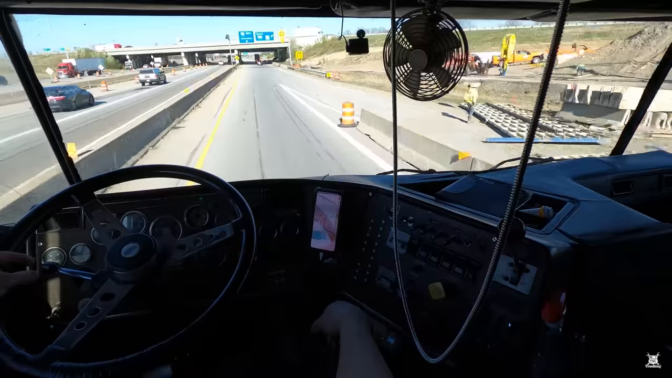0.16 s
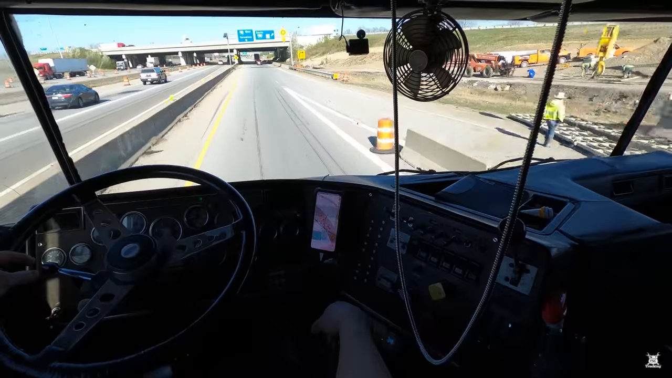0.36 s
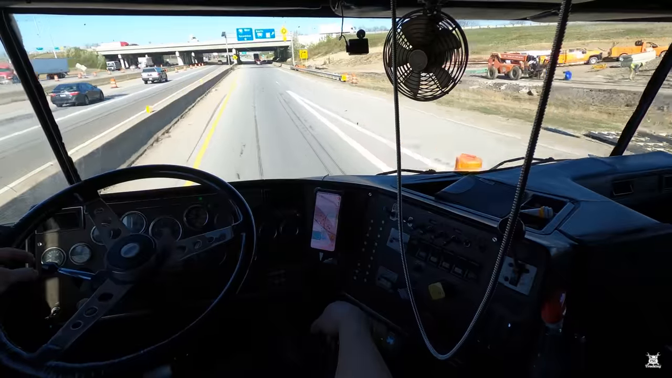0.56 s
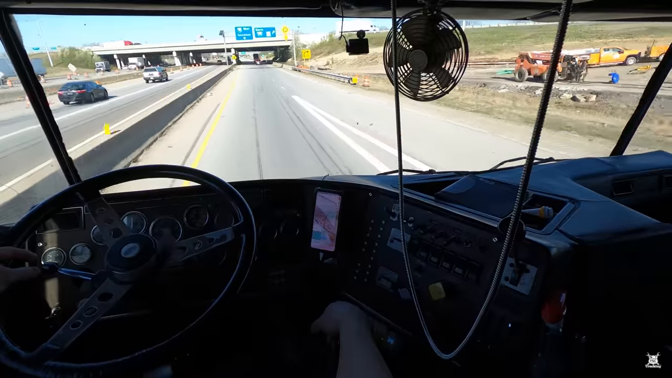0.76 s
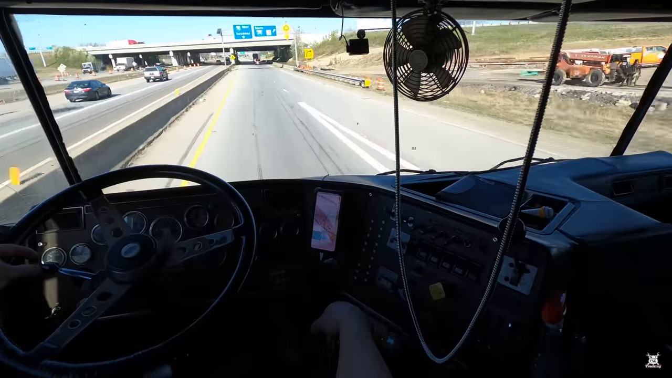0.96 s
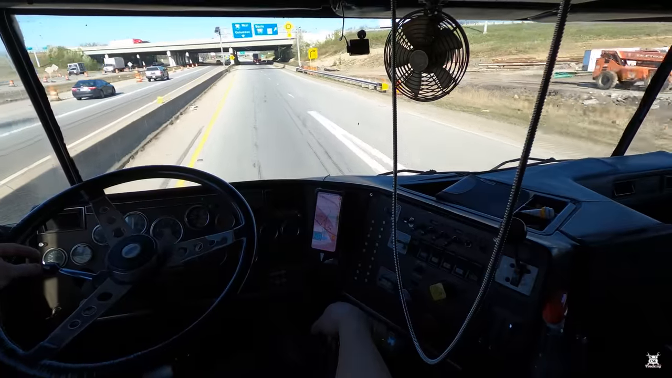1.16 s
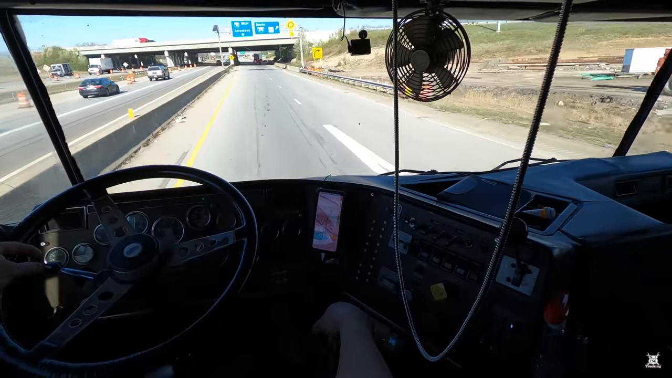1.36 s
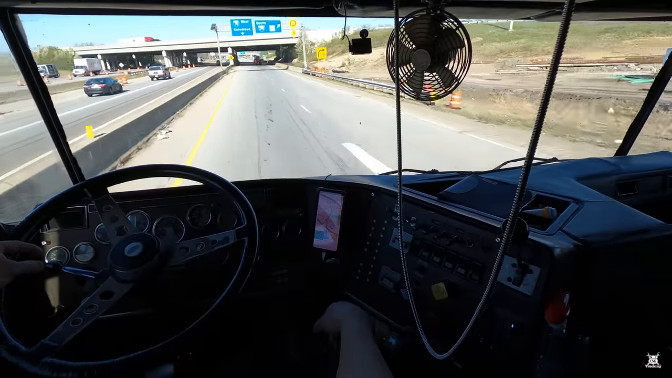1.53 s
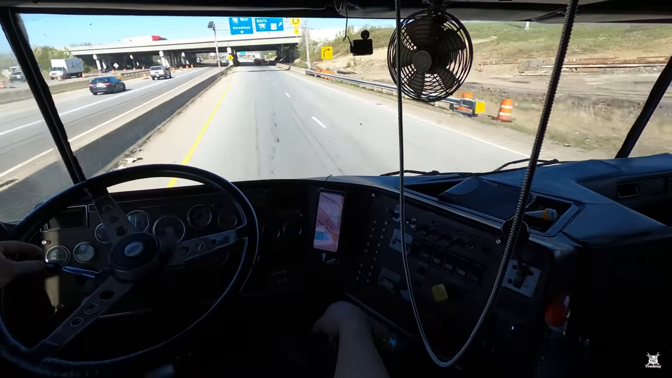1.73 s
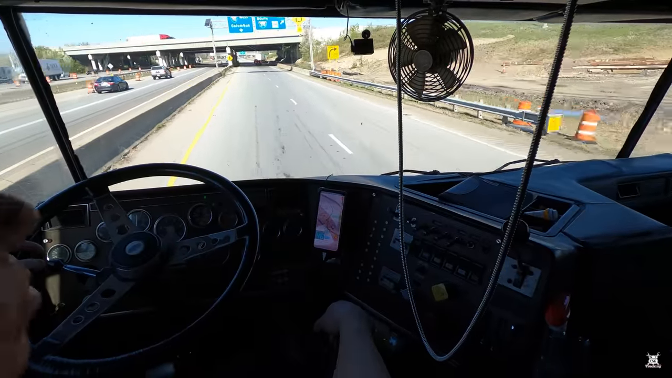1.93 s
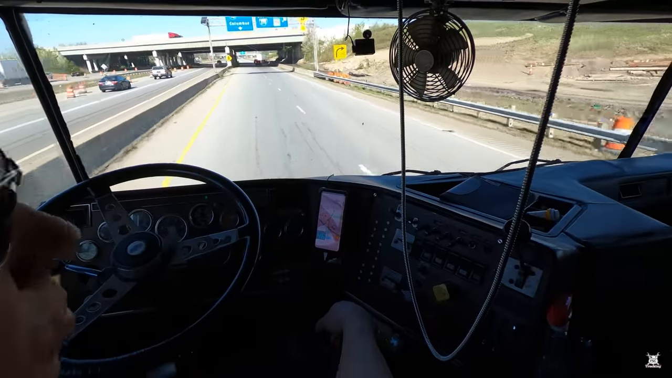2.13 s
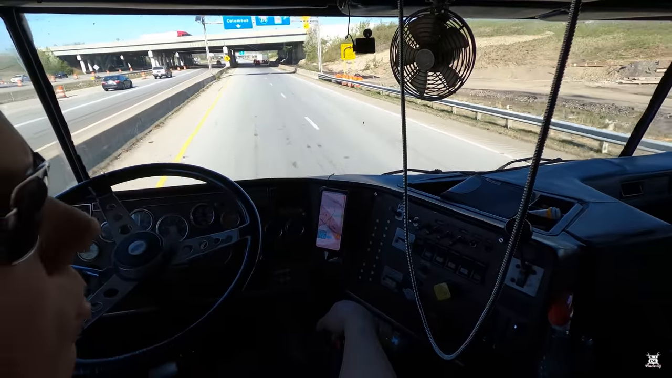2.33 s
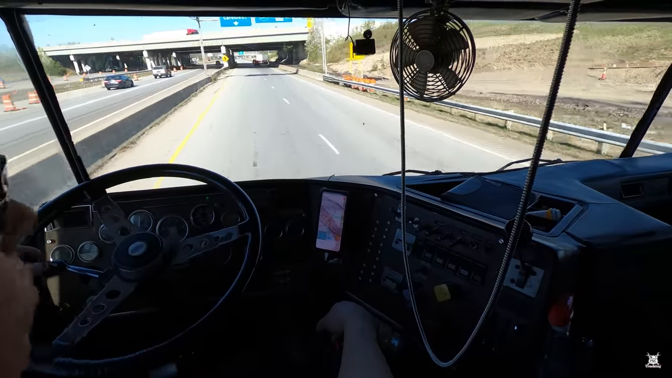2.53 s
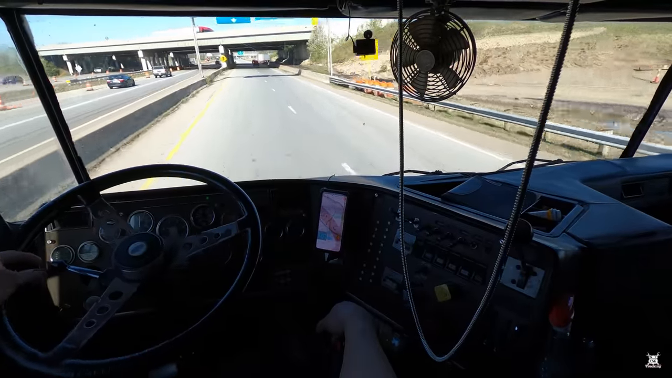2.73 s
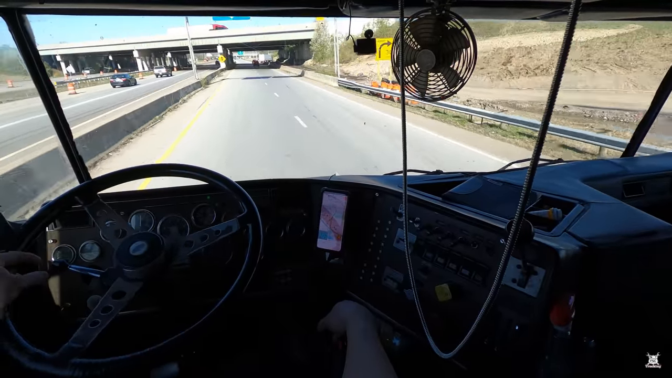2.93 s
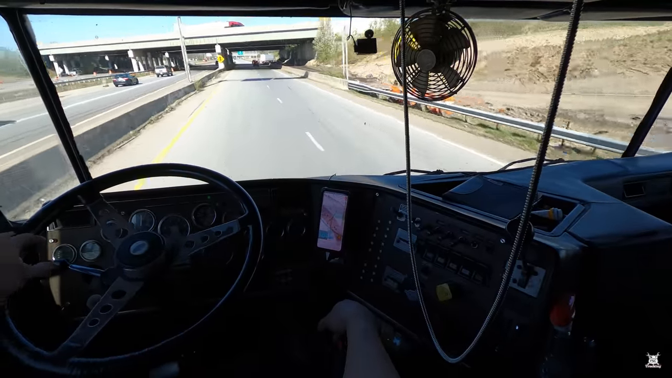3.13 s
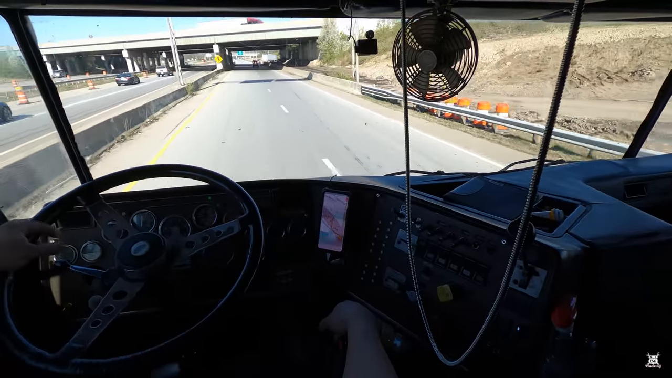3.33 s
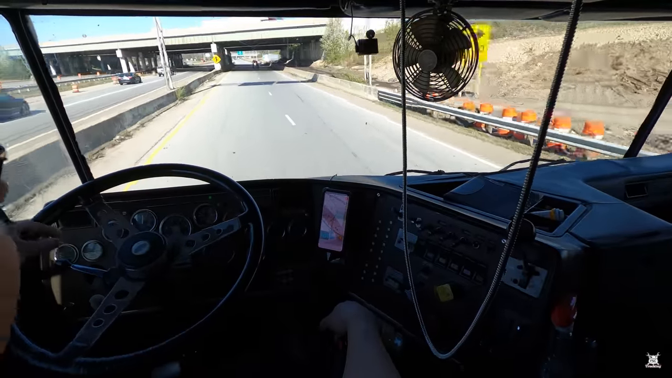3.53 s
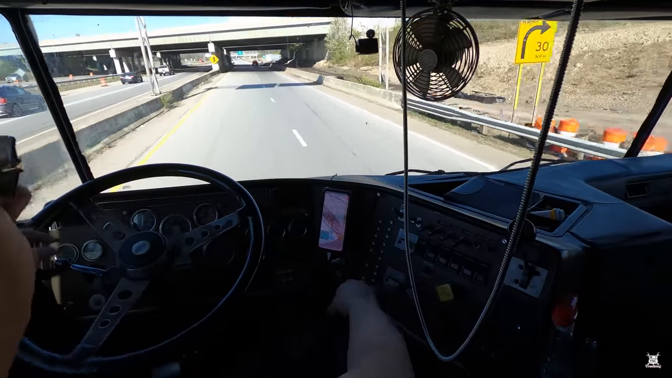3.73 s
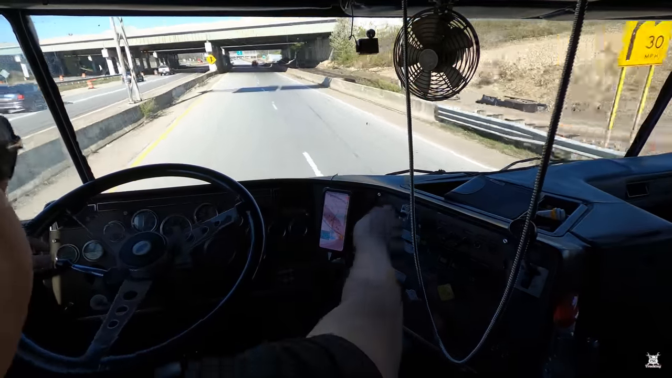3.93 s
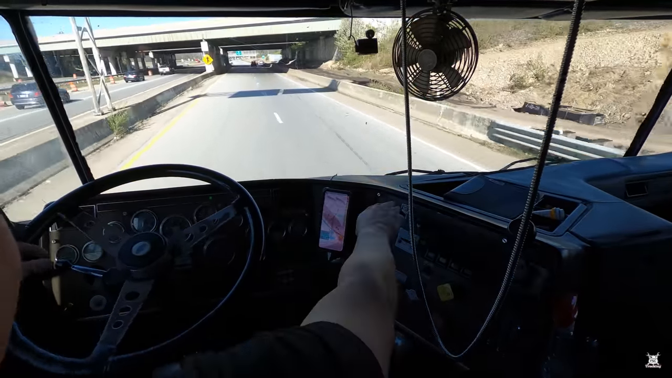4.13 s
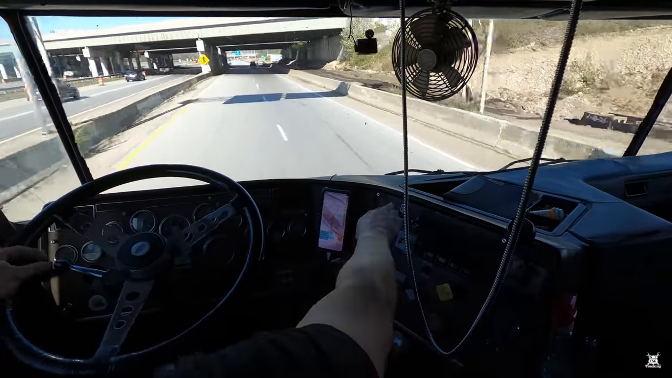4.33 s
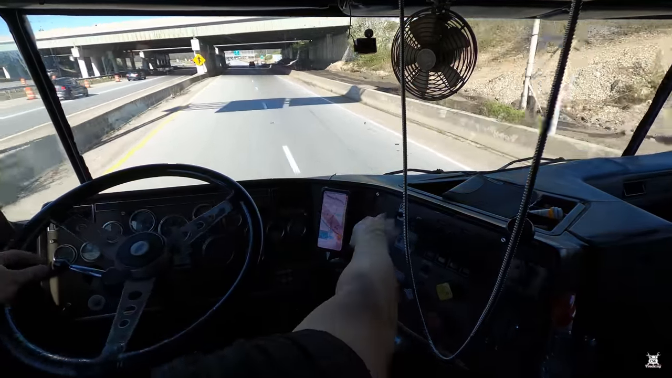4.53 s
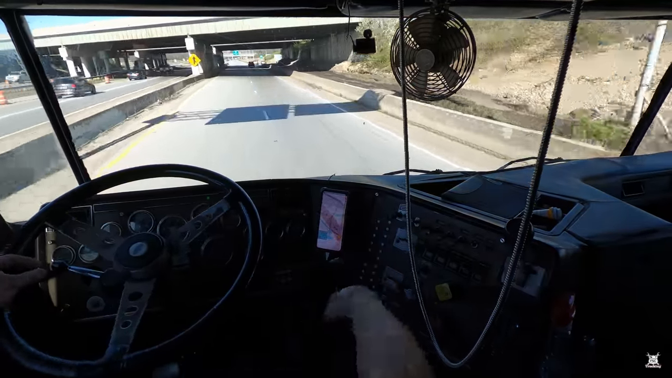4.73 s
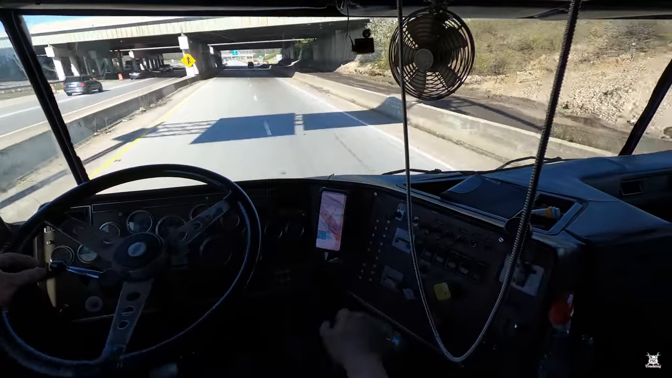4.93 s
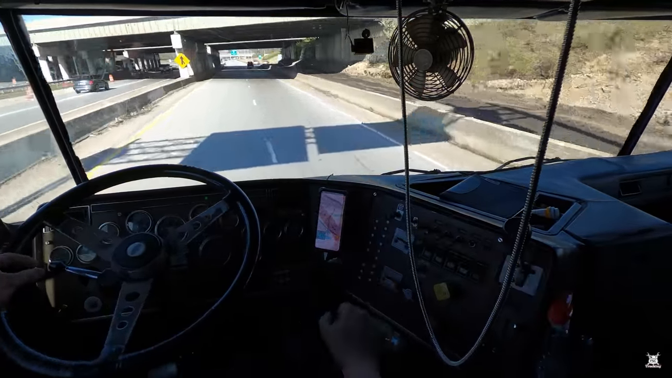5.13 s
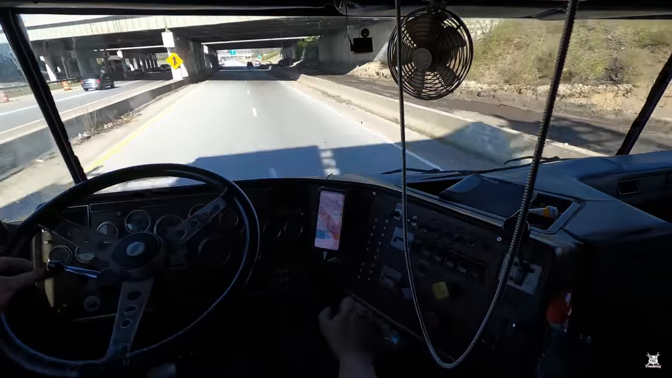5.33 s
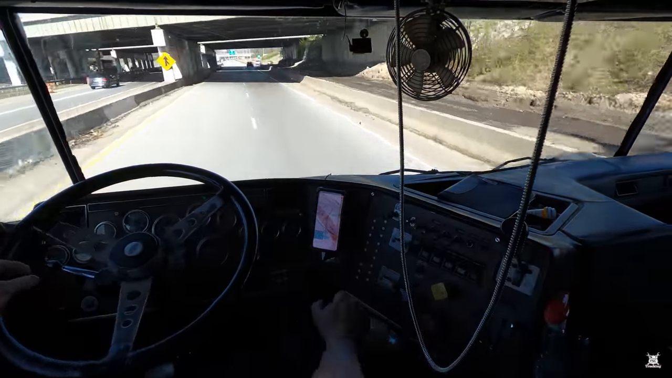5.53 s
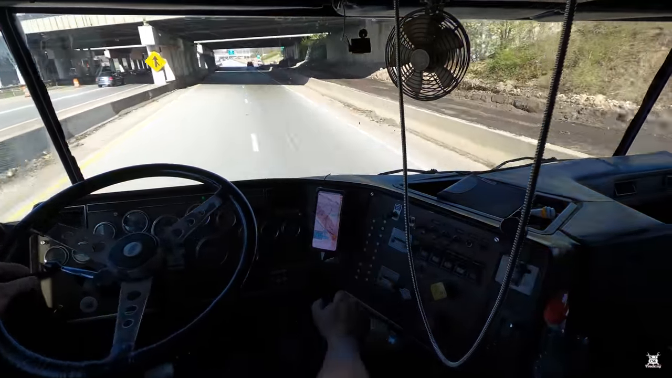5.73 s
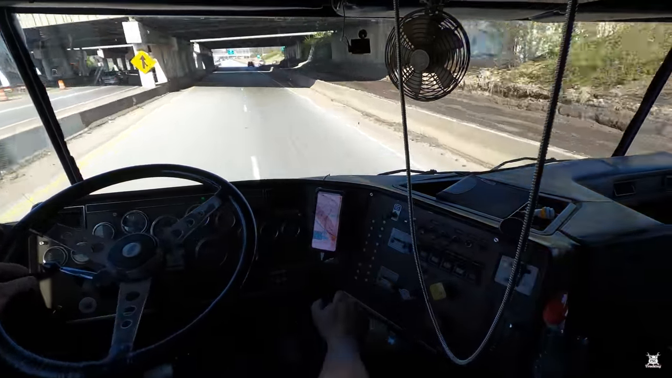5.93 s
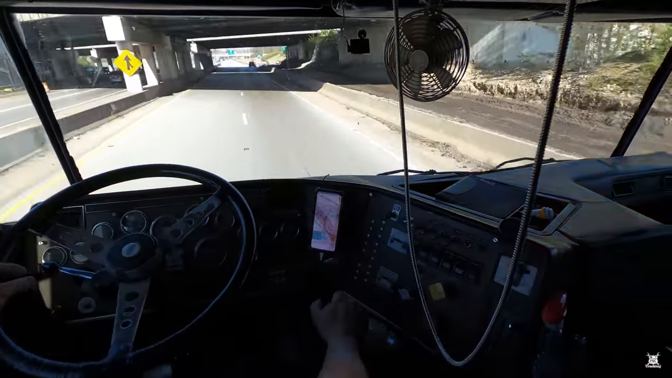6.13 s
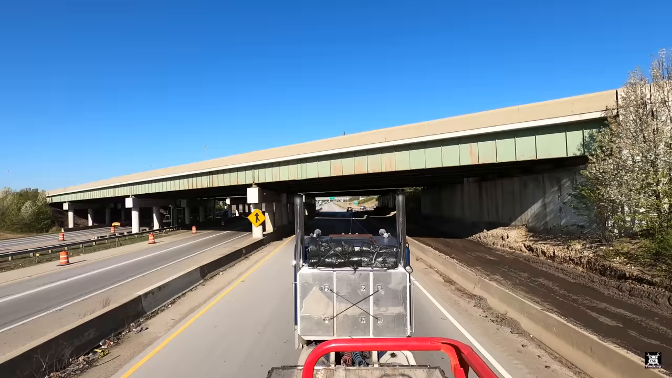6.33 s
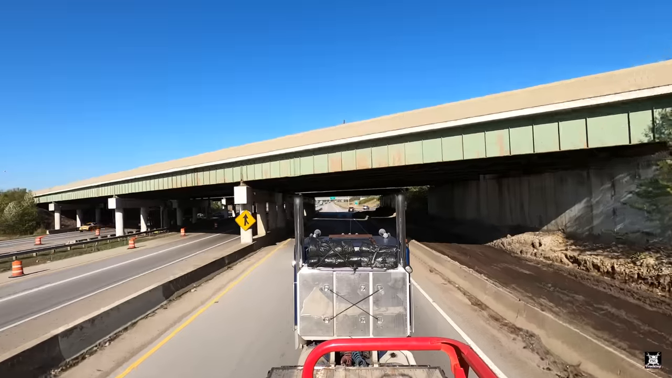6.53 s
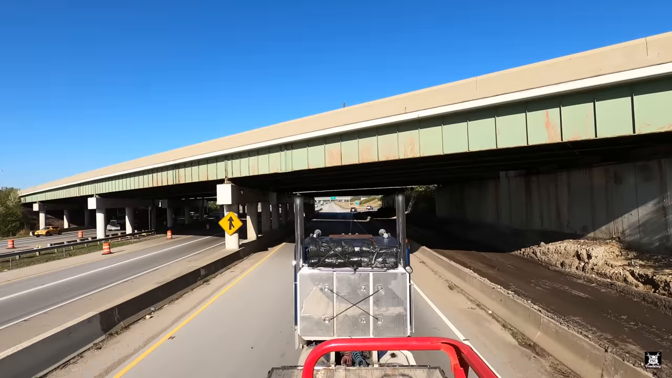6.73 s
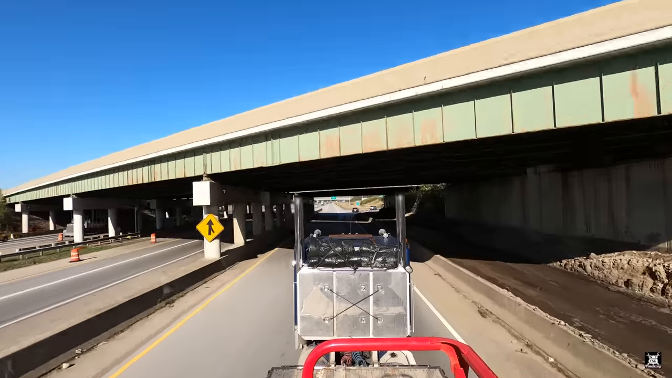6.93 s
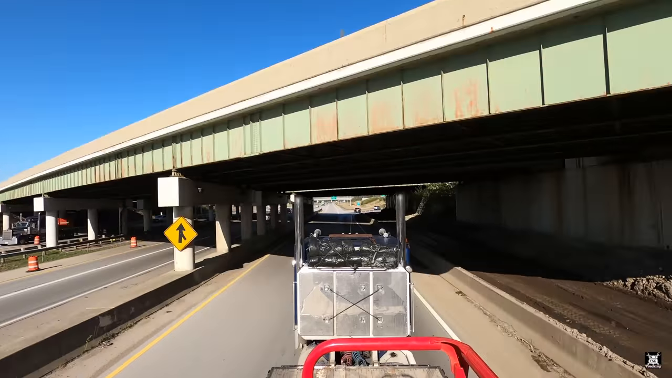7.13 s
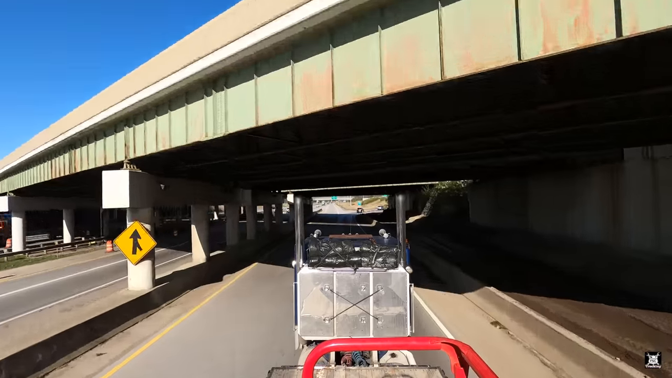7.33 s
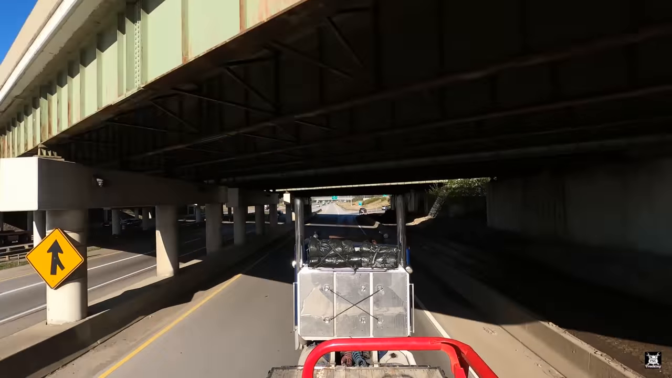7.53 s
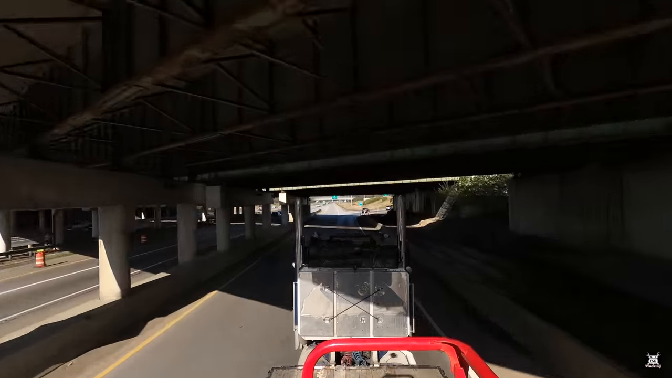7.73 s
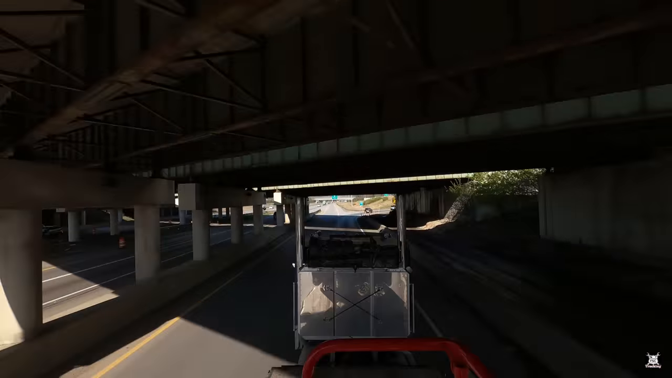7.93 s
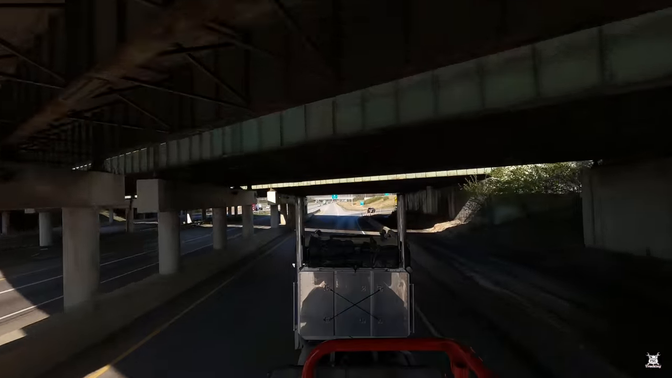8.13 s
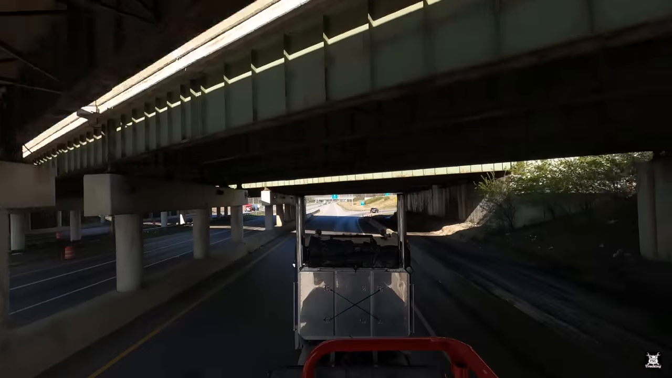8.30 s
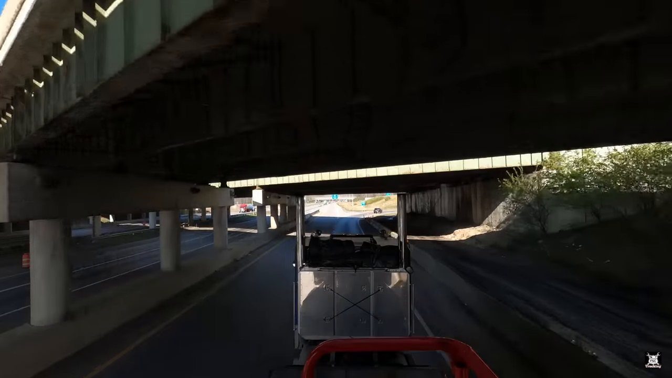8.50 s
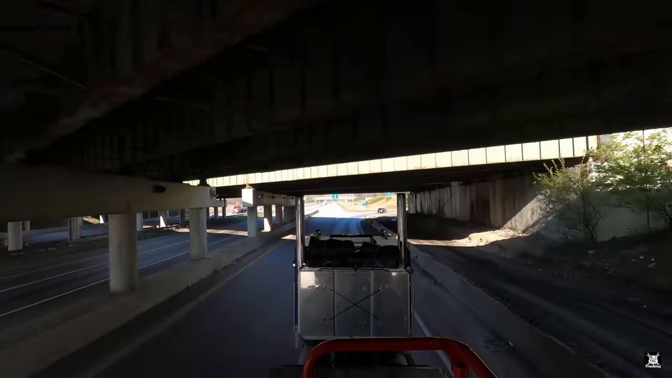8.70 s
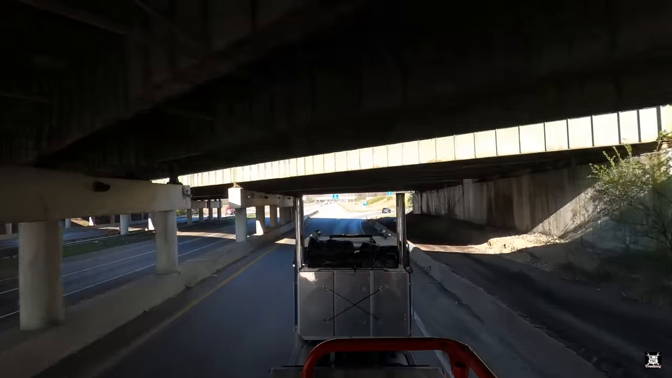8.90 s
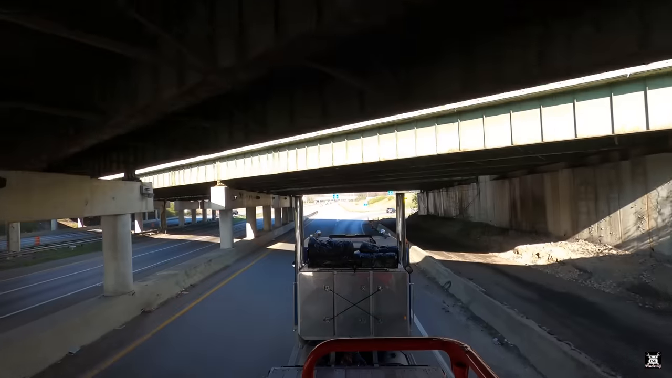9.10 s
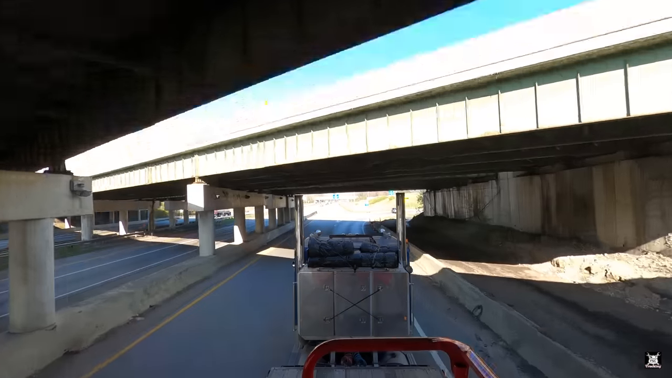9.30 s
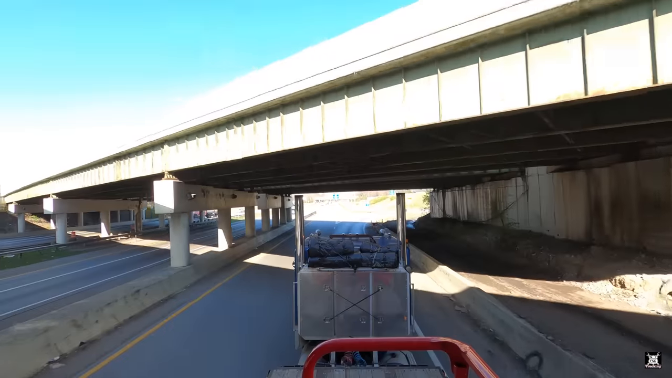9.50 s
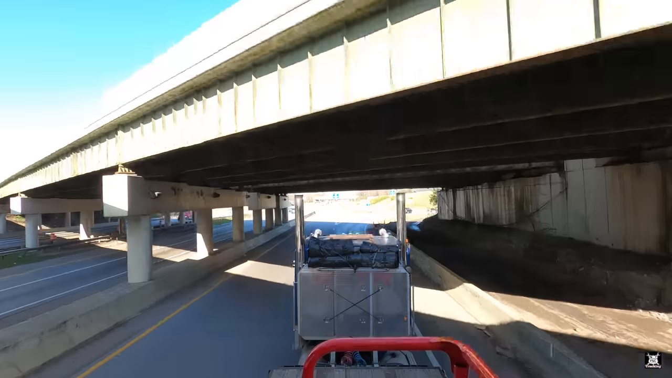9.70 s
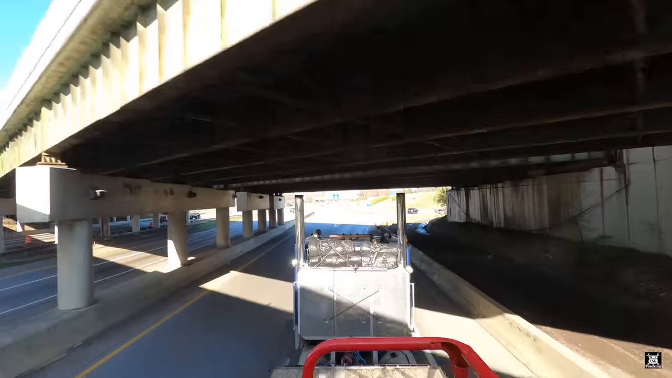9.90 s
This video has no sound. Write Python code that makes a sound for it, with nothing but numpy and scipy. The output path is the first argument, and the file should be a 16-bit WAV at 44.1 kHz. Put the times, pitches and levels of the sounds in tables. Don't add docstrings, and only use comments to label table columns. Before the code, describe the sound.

A heavy truck decelerates on a highway, its engine droning and softening in the enclosed cab. Sharp plastic clicks, a small thud and a short air hiss come before a throaty throttle blip and rising pull. A crossfade opens to a close outside position behind the cab: much louder, wider, with deep exhaust hum thrown back by the concrete deck, tyre whine and rushing air until the abrupt end.

```python
import sys
import numpy as np
from scipy import signal
from scipy.fft import rfft, irfft
from scipy.io import wavfile
from scipy.ndimage import uniform_filter1d

SR = 44100
rng = np.random.default_rng(int(sys.argv[2]) if len(sys.argv) > 2 else 0)


def pcm_store(signal):
    levels = np.round(np.clip(np.atleast_2d(signal), -1, 1) * 32767)
    wavfile.write(sys.argv[1], SR, levels.astype(np.int16).T)


def invert_db(x):
    u = np.asarray(x, float) / 20
    return 10 ** u


N = 439236
TIME = np.arange(N) / SR
COARSE = np.arange(0, N / SR + .02, .01)

# (time [s], firing rate [Hz])
SPEED = [(0.0, 75.0), (1.0, 72.2), (4.0, 64.6), (4.5, 63.5), (5.3, 62.4), (5.5, 64.0), (5.62, 66.0),
         (5.75, 70.6), (5.9, 74.3), (6.2, 78.8), (6.5, 83.6), (6.7, 85.4), (6.85, 84.5), (7.0, 83.7),
         (7.6, 83.5), (8.0, 82.7), (8.75, 82.0), (9.96, 80.0)]
# (time [s], level [dB])
THROTTLE = [(4.5, -40), (4.7, -18), (5.43, -15), (5.52, -1), (5.6, 0), (5.74, -2), (5.88, -11), (6.0, -7),
            (6.78, 0), (6.86, -14), (6.93, -20)]
# (time [s], level [dB])
FADER = [(6.45, -40), (6.65, -19), (6.9, -9), (7.1, -5), (7.4, -2), (7.6, 0), (9.96, 0)]


def evened(x):
    return x / np.sqrt(np.mean(x ** 2) + 1e-20)


def read(points, hz):
    f, value = np.transpose(points)
    return np.interp(np.log(hz + 1), np.log(f + 1), value, right=-200)


def curves(rows, t, quiet=None):
    s, *columns = np.transpose(rows)
    return [np.interp(t, s, c, quiet, quiet) for c in columns]


def drift(t, fastest_hz):
    f = np.geomspace(fastest_hz / 20, fastest_hz, 12)[:, None]
    turns = f * t + rng.random((12, 1))
    return evened((np.sin(2 * np.pi * turns) / f ** 0.58).sum(0))


def swells(rows, t):
    return [np.exp(-((t - s) / half) ** 2) for s, half, _ in rows]


def swell_level(rows, t):
    return sum(invert_db(row[2]) * bell for row, bell in zip(rows, swells(rows, t)))


def shaped(table, hz):
    return sum(db / (1 + (2 * (hz - f) / width) ** 2) for f, width, db in table)


def resonate(x, hz, width):
    b, a = signal.iirpeak(hz, hz / width, SR)
    return signal.lfilter(b, a, signal.lfilter(b, a, x))


def lowpass(x, order, hz):
    return signal.sosfilt(signal.butter(order, hz, fs=SR, output="sos"), x)


def noise_bursts(rows):
    out = np.zeros(N)
    for s, length, hz, width, db in rows:
        burst = evened(resonate(rng.standard_normal(round(length * SR)), hz, width))
        out[round(s * SR):][:len(burst)] += invert_db(db) * burst * signal.windows.tukey(len(burst), .6)
    return out


def crank():
    return np.cumsum(curves(SPEED, TIME)[0]) / SR


def braking(t):
    off_s, close_s = 4.53, .13
    return np.cos(np.pi / 2 * np.clip((t - off_s) / close_s, 0, 1)) ** 4


def pedal_effort():
    return invert_db(curves(THROTTLE, COARSE, -120)[0])


def outside_db(t):
    return np.where(t < FADER[0][0], -120, curves(FADER, t)[0])


def booms():
    # (firing multiple [1], braking [dB], throttle [dB], outside [dB], bridge gain [dB])
    partials = [(1, -25.3, -28.5, -19.5, 0.5), (1.5, -90, -31, -24, 4.5), (2, -28, -29, -21.5, 11.8),
                (3, -31.5, -38, -27.5, 0.5), (4, -43, -50, -33, 0.1), (4.5, -90, -45, -33, 1.5),
                (5, -35, -60, -70, 0.1), (6, -38, -60, -70, 0.1)]
    bridge_sags = [0.6, -2.5, -2.2, 0.8, 0.1, 3.5, 0.1, 0.1]
    eases = [-0.5, -12, 0.5, 0.5, 9, -8, 0.1, 0.1]
    wobbles = [0.8, 1.5, 1.0, 4.0, 2.0, 1.5, 0.7, 0.7]
    # (frequency [Hz], width [Hz], level [dB])
    hollow = [(75, 4, -2.5), (127.5, 4, -8), (133.5, 12, 8), (144.7, 3, -11), (148.5, 5, 8.5),
              (194, 14, 9.5), (221.5, 3, -10), (319, 9, 12.5), (339, 20, -10), (368, 30, 12), (383, 8, 4),
              (398, 12, -10), (432, 22, 7)]
    # (frequency [Hz], width [Hz], level [dB])
    pipe = [(65.5, 12, 6.5), (170, 32, 12), (250, 40, 7)]
    # (time [s], half length [s], share lost [1])
    deck_gap = (9.2, .14, .65)
    # (time [s], half length [s], share gained [1])
    deck_edge = (7.63, .13, .27)
    bridge_s, bridge_rise_s = 7.46, .08
    ease_s, ease_length_s = 9.1, .5
    high_close = .5
    inside_wobble_db = 0.55

    cycle_hz, cycles = curves(SPEED, COARSE)[0] / 6, crank() / 6
    brake, pedal, fader_db = braking(COARSE), pedal_effort(), outside_db(COARSE)
    under = COARSE - bridge_s
    bridge = np.clip(under / bridge_rise_s, 0, 1) - deck_gap[2] * swells([deck_gap], COARSE)[0]
    bridge = bridge + deck_edge[2] * swells([deck_edge], COARSE)[0]
    easing = np.clip((COARSE - ease_s) / ease_length_s, 0, 1)
    second_lag = -.46 / (1 + np.exp((12 * cycle_hz - 143) / 1.5))
    third_lag = .7 - .8 / (1 + np.exp((18 * cycle_hz - 207) / 8))
    lags = 0, 0, second_lag, third_lag, .3, .6, 0, .4
    out = np.zeros(N)
    for partial, sag_db, ease_db, wander_db, lag in zip(partials, bridge_sags, eases, wobbles, lags):
        multiple, brake_db, pedal_db, open_db, bridge_db = partial
        k = round(2 * multiple) * 3
        braked = invert_db(brake_db + shaped(hollow, k * cycle_hz)) * brake ** (1 + high_close * (multiple - 1))
        pulled = invert_db(pedal_db + shaped(pipe, k * cycle_hz)) * pedal
        inside = (braked + pulled) * invert_db(inside_wobble_db * drift(COARSE, 9.0))
        echo_db = bridge_db * bridge + sag_db * np.maximum(under, 0) + ease_db * easing
        level = inside + invert_db(open_db + fader_db + echo_db + wander_db * drift(COARSE, 6.0))
        turns = k * cycles + np.interp(TIME, COARSE, lag + 0 * COARSE)
        out += np.interp(TIME, COARSE, level) * np.cos(2 * np.pi * turns)
    return np.sqrt(2) * out


def cycle_lines():
    # (cycle multiple [1], level [dB])
    braking_lines = [(7, -47), (8, -39), (9, -39.5), (10, -43.5), (14, -42), (15, -38), (16, -41.5),
                     (17, -44), (19, -41.5), (20, -38.5), (21, -48.5), (22, -47), (23, -36), (25, -44),
                     (26, -40.5), (27, -39.5), (28, -40.5), (29, -39), (31, -43), (33, -43), (34, -46.5),
                     (39, -45), (42, -44), (45, -48.5), (48, -46.5), (51, -49), (54, -51.5), (57, -50.5)]
    # (cycle multiple [1], level [dB])
    pulling_lines = [(4, -37), (5, -32), (7, -35), (8, -30.5), (10, -32.5), (11, -36), (13, -27), (14, -31),
                     (15, -32.5), (16, -35), (20, -32), (21, -38.5), (23, -31.5), (26, -37), (28, -26.5),
                     (29, -34), (30, -25), (31, -30.5), (32, -33), (33, -31.5), (34, -33.5), (36, -34.5),
                     (39, -37)]
    # (frequency [Hz], width [Hz], level [dB])
    cab_modes = [(115, 18, 10), (153, 11, -12), (175, 16, 7.5), (282, 23, -4), (318.4, 13, 7),
                 (337, 8.2, -8), (375.8, 54, 9.5), (423, 54, 3.5), (467.7, 22, 10), (514, 29, -13),
                 (550, 20, 2)]
    cycle_hz, cycles = curves(SPEED, COARSE)[0] / 6, crank() / 6
    braked = braking(COARSE) * invert_db(3.3 - 1.4 * COARSE)
    pulled = invert_db(-20) * pedal_effort() + invert_db(1.8 * outside_db(COARSE))
    out = np.zeros(N)
    for lines, effort, cab, wander_db in (braking_lines, braked, 1, 1.8), (pulling_lines, pulled, 0, 2.5):
        live = np.interp(TIME, COARSE, effort) > .003
        for multiple, db in lines:
            k = round(multiple)
            level_db = db + cab * shaped(cab_modes, k * cycle_hz) + wander_db * drift(COARSE, 5.0)
            level = np.interp(TIME[live], COARSE, effort * invert_db(level_db))
            out[live] += level * np.cos(2 * np.pi * (k * cycles[live] + rng.random()))
    return np.sqrt(2) * out


def knock():
    # (frequency [Hz], width [Hz], level [dB])
    head = [(646, 200, -0.5), (1250, 180, -10.5)]
    # (frequency [Hz], width [Hz], level [dB])
    block = [(985, 170, 3), (1810, 250, -1), (2280, 110, -6.5), (3300, 300, -13.5), (4440, 250, -18),
             (5350, 250, -22.5)]
    sharp, uneven_db = 1.4, 3.0
    firings = crank()
    cylinder_db = uneven_db * rng.standard_normal(6)[firings.astype(int) % 6]
    bursts = invert_db(cylinder_db) * np.exp(-sharp * ((firings + .5) % 1)) * rng.standard_normal(N)
    pedal_db = curves(THROTTLE, TIME)[0]
    pressed = np.clip((TIME - THROTTLE[2][0]) / .08, 0, 1) * np.clip((THROTTLE[-1][0] - TIME) / .2, 0, 1)
    bite_db = 4.5 * swells([(THROTTLE[3][0], .05, 0)], TIME)[0]
    clatter = braking(TIME) * invert_db(-40 - 1.5 * TIME)
    pulling = pressed * invert_db(-42.5 + .4 * pedal_db + bite_db)
    out = 0
    for modes, level in (head, clatter), (block, pulling):
        ring = sum(invert_db(db) * evened(resonate(bursts, hz, width)) for hz, width, db in modes)
        out = out + level * evened(ring)
    return lowpass(out, 6, 9000)


def road():
    # (frequency [Hz], density [dB/Hz])
    inside = [(26, -69), (60, -65), (110, -54.5), (210, -56), (270, -53.5), (350, -58.5), (440, -56),
              (520, -62.5), (990, -75), (1600, -81), (2900, -90), (7700, -113), (11000, -121),
              (16000, -130)]
    # (frequency [Hz], density [dB/Hz])
    exterior = [(26, -58.5), (60, -51), (85, -46), (160, -42.5), (400, -47.5), (620, -50.5), (1240, -60.5),
                (2100, -71.5), (3500, -76), (5900, -88), (7500, -95), (8400, -105), (12700, -113),
                (15500, -122)]
    # (frequency [Hz], width [Hz], level [dB])
    panels = [(567, 24, 3.5), (702, 30, 6.5), (784, 90, 7), (1075, 49, 3), (1250, 59, 7.5), (1930, 230, 3),
              (2650, 170, 1.5), (5900, 270, 1), (9300, 500, 5)]
    # (time [s], level [dB])
    roar = [(0.0, -30.5), (0.7, -32.5), (1.3, -32), (2.7, -35.5), (3.9, -38.5), (4.47, -37.5), (4.7, -41.3),
            (4.85, -37.5), (5.44, -34), (5.72, -31), (5.8, -35.5), (6.5, -29.8), (6.96, -22.5),
            (7.42, -19.5), (7.5, -17), (7.6, -20.5), (9.13, -19.8), (9.4, -22)]
    # (start [s], end [s])
    fade = (6.15, 7.5)
    # (time [s], half length [s], level [dB])
    gusts = [(5.0, .1, 2.5), (5.5, .05, 2), (6.85, .45, -3), (7.44, .06, -3), (7.56, .04, 1.5),
             (7.68, .07, 2.5), (8.0, .04, -2), (8.17, .05, 2.5), (9.15, .15, 2), (9.55, .1, -4),
             (9.7, .04, 2), (9.92, .17, 5)]
    # (time [s], frequency [Hz])
    edge = [(0, 12700), (6.55, 12700), (6.7, 14000), (7.6, 13600), (8.3, 13700), (9.96, 15500)]
    # (time [s], side against mid [dB])
    spread = [(6.45, -61), (6.55, -23), (7.2, -37), (7.75, -37), (8.3, -26), (8.7, -40), (8.95, -21),
              (9.5, -7.5), (9.96, -5.5)]
    # (frequency [Hz], level [dB])
    side_colour = [(100, -13.5), (400, -16), (1200, -14.5), (4000, 0.5), (8000, 0.5), (9500, -14.5)]
    patchy_db, gust_db, outside_gust_db, top_side_db = 1.0, 0.28, 0.5, -1.5
    hiss_offset_db, rumble_in_db, rumble_out_db = -17, -0.7, -2.7
    ragged_hz, top_hz = 1000, 15700

    frames, hz = N // 512 + 5, np.fft.rfftfreq(2048, 1 / SR)[:, None]
    t = np.arange(frames) * 512 / SR
    a, b, c, d, patches = rng.standard_normal((frames, 1025, 5)).T
    outside = np.clip((t - fade[0]) / (fade[1] - fade[0]), 0, 1)
    colour_db = (1 - outside) * (read(inside, hz) + shaped(panels, hz)) + outside * read(exterior, hz)
    roar_db = curves(roar, t)[0]
    hiss_db = roar_db + hiss_offset_db + sum(row[2] * bell for row, bell in zip(gusts, swells(gusts, t)))
    rumble_db = rumble_in_db + outside * (rumble_out_db - rumble_in_db) + 0.8 * drift(t, 5.0)

    def missing_db(lo, hi, db):
        band = (hz[:, 0] > lo) & (hz[:, 0] < hi)
        return db - 10 * np.log10((invert_db(colour_db[band]) ** 2).sum(0) * SR / 2048)

    roar_db = missing_db(600, 1500, roar_db)
    hiss_db = missing_db(2500, 8000, hiss_db)
    hiss_db = hiss_db + (gust_db + outside * outside_gust_db) * drift(t, 22.0)
    high = np.clip(np.log2(hz / 1200 + 1e-9) / 1.4, 0, 1)
    low = np.clip(np.log2(600 / (hz + 1e-9)) / 0.98, 0, 1)
    patches = evened(uniform_filter1d(uniform_filter1d(patches, size=24, axis=0), size=7, axis=1))
    level_db = colour_db + (1 - high) * roar_db + high * hiss_db + low * rumble_db
    jumps = np.repeat(rng.random(frames // 3 + 1), 3)[:frames] ** 4 * (t > FADER[0][0])
    passed = hz < np.minimum(curves(edge, t)[0] + 2 * ragged_hz * jumps, top_hz)
    mid = passed * invert_db(level_db + patchy_db * patches) * np.sqrt(SR / 2048 * .375 * 2)
    side = mid * (invert_db(curves(spread, t)[0] + read(side_colour, hz)) + invert_db(top_side_db) * (hz > 11200))
    z = np.array([mid * (a + 1j * b), side * (c + 1j * d)])
    return signal.istft(z, nperseg=2048, noverlap=1536)[1][:, :N]


def switches():
    # (time [s], peak [dB], brightness [dB/octave], t60 [s], pitch factor [1])
    clicks = [(2.7704, -40, 1, 0.06, 1.01), (3.268, -43.5, 1, 0.06, 1.01), (4.4655, -27.5, 0.5, 0.11, 1.0),
              (4.4953, -23.5, 0.5, 0.09, 1.05), (4.7311, -42, -3, 0.06, 1.01), (5.1317, -47, 0, 0.06, 1.01),
              (5.3644, -44.5, 2, 0.052, 1.01), (5.5638, -30.5, -4, 0.06, .8), (5.9199, -45, 0, 0.06, 1.01),
              (7.1571, -19, 2.5, 0.16, 1.0)]
    # (frequency [Hz], width [Hz], level [dB])
    plastic = [(2990, 400, 8), (3500, 450, -2), (4500, 500, -9), (5180, 490, -9.5), (6140, 510, -11),
               (7400, 820, -14), (9600, 900, -21.5), (11500, 1200, -27)]
    out, t = np.zeros(N), np.arange(4000) / SR
    for s, peak_db, bright_db, t60, pitch in clicks:
        decay = invert_db(-60 * t / 0.024) + 0.33 * invert_db(-60 * t / t60)
        rattle = rng.standard_normal(len(t)) * decay * np.minimum(t / 0.00071, 1)
        rattle[30] += 11.0
        ring = 0
        for k, (hz, width, db) in enumerate(plastic):
            level = (-1) ** k * invert_db(db + bright_db * np.log2(hz / 3000))
            ring = ring + level * resonate(rattle, hz * pitch, width)
        out[round(s * SR):][:len(t)] += invert_db(peak_db) * ring / abs(ring).max()
    return lowpass(out, 8, 13000)


def trim():
    # (time [s], length [s], frequency [Hz], width [Hz], level [dB])
    squeaks = [(6.745, .018, 9300, 600, -64), (6.767, .022, 9200, 600, -61), (7.132, .014, 9200, 2200, -58),
               (4.6, .25, 235, 80, -36), (4.53, .13, 540, 200, -38), (5.44, .14, 250, 80, -30),
               (5.68, .36, 230, 36, -32), (5.65, .11, 3750, 450, -54), (5.8, .045, 3250, 400, -55),
               (5.5, .05, 1800, 500, -47), (5.51, .04, 3100, 700, -54), (6.33, .1, 4550, 400, -60),
               (9.82, .135, 9500, 4000, -63)]
    return lowpass(noise_bursts(squeaks), 10, 13500)


def air_valves():
    # (time [s], length [s], frequency [Hz], width [Hz], level [dB])
    chuff = (4.545, .11, 230, 200, -31)
    # (start [s], attack [s], hold [s], release [s], level [dB])
    puff = (4.81, .025, .1, .05, -48)
    # (frequency [Hz], level [dB])
    nozzle = [(1500, -11), (2600, 4), (4500, -5), (5700, -9), (6150, -2.5), (6600, -7.5), (8600, -20),
              (9300, -11), (10000, -19), (11500, -23), (13500, -43)]
    hiss = irfft(rfft(rng.standard_normal(N)) * invert_db(read(nozzle, np.fft.rfftfreq(N, 1 / SR))), N)
    start, attack, hold, release, db = puff
    fall_db = 20 * np.maximum(TIME - start - attack - hold, 0) / release
    level = invert_db(db - fall_db) * np.clip((TIME - start) / attack, 0, 1)
    return lowpass(level * evened(hiss) + noise_bursts([chuff]), 10, 13500)


def thuds():
    # (time [s], half length [s], frequency [Hz], level [dB])
    jolts = [(4.575, .02, 262, -30), (4.58, .025, 128, -32), (4.575, .02, 410, -35), (4.74, .015, 150, -33),
             (5.52, .02, 250, -32), (6.99, .025, 112, -23), (7.01, .02, 215, -24), (7.444, .022, 120, -14),
             (7.539, .035, 122, -12), (7.44, .015, 450, -19), (7.44, .012, 1150, -25),
             (7.475, .012, 850, -24), (7.495, .012, 620, -22), (7.54, .012, 1020, -23)]
    out = np.zeros(N)
    for s, half, hz, db in jolts:
        near = slice(round((s - 3 * half) * SR), round((s + 3 * half) * SR))
        t = TIME[near] - s
        out[near] += invert_db(db) * np.exp(-(t / half) ** 2) * np.cos(2 * np.pi * hz * t)
    return np.sqrt(2) * out


def driveline():
    # (time [s], half length [s], level [dB])
    moan = [
        (4.76, .05, -36),
        (4.92, .14, -28.5),
    ]
    hz = 176 - 125 * np.clip(TIME - 4.72, 0, 1) ** 2
    return np.sqrt(2) * swell_level(moan, TIME) * np.sin(2 * np.pi * np.cumsum(hz) / SR)


def tyres():
    # (frequency [Hz], width [Hz], level [dB])
    modes = [(251.3, 16, -2), (155.4, 8.8, -9), (237.4, 14, -6)]
    # (time [s], half length [s], level [dB])
    bumps = [(6.788, .04, -33), (6.968, .03, -26), (7.024, .05, -25), (7.262, .04, -25), (7.385, .05, -22),
             (7.49, .06, -19.5), (7.65, .12, -35)]
    hum = sum(invert_db(db) * evened(resonate(rng.standard_normal(N), hz, width)) for hz, width, db in modes)
    lumps = evened(resonate(rng.standard_normal(N), 56, 42))
    mid_bridge_db = 5.3 * swells([(8.6, .42, 0)], TIME)[0]
    hum_db = -21.5 + outside_db(TIME) + mid_bridge_db
    return invert_db(hum_db) * evened(hum) + swell_level(bumps, TIME) * lumps


def tread():
    # (frequency [Hz], pitch wander [Hz], level wander [dB])
    tones = [(238, 3.0, 3.0), (371, 2.6, 2.2)]
    # (time [s], level [dB])
    loudness = [
        [(6.6, -36), (7.0, -24), (7.4, -19), (7.55, -20), (7.95, -27), (8.25, -17), (8.5, -17), (8.75, -25),
         (8.9, -19), (9.05, -28), (9.4, -19), (9.55, -30), (9.8, -27), (9.96, -17)],
        [(6.6, -40), (7.25, -36), (7.4, -25), (7.75, -28), (8.1, -22), (8.4, -20), (8.85, -18.5), (9.1, -22),
         (9.3, -18.5), (9.65, -22), (9.8, -20), (9.96, -21.5)],
    ]
    out = np.zeros(N)
    for (hz, wander_hz, wander_db), loud in zip(tones, loudness):
        turns = np.cumsum(np.interp(TIME, COARSE, hz + wander_hz * drift(COARSE, 8.0))) / SR
        level = invert_db(curves(loud, COARSE, -120)[0] + wander_db * drift(COARSE, 12.0))
        out += np.interp(TIME, COARSE, level) * np.cos(2 * np.pi * turns)
    return np.sqrt(2) * out


def scene():
    rush, side = road()
    mid = booms() + cycle_lines() + knock() + rush + switches() + trim() + air_valves()
    mid = mid + thuds() + driveline() + tyres() + tread()
    return np.array([mid + side, mid - side])


def low_pass(x):
    return signal.sosfilt(signal.butter(12, 19890, fs=SR, output="sos"), x)


def record(dry):
    knee = .95
    ending = np.minimum(np.arange(N)[::-1] / 60, 1)
    over = np.maximum(abs(dry) - knee, 0)
    limited = dry - np.sign(dry) * (over - (1 - knee) * np.tanh(over / (1 - knee)))
    return low_pass(limited * ending)


dry = scene()
out = record(dry)
pcm_store(out)
```